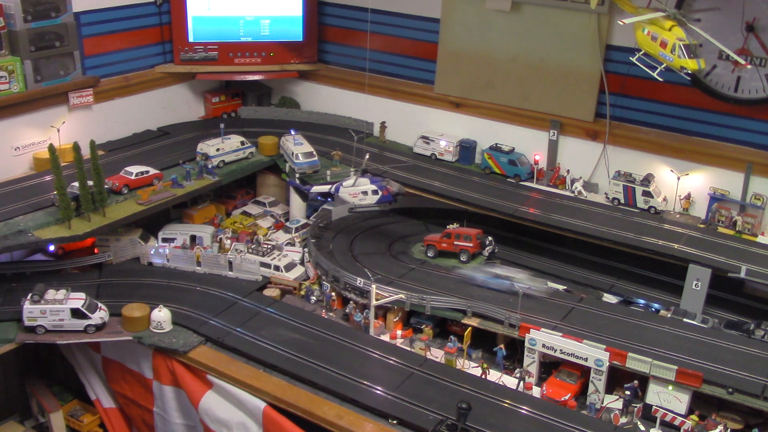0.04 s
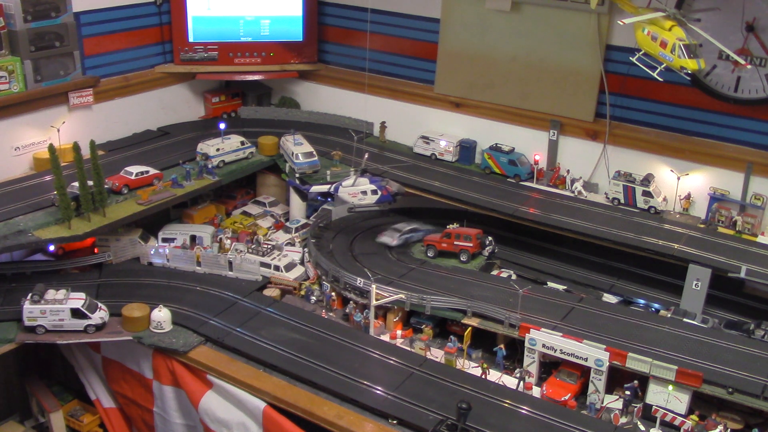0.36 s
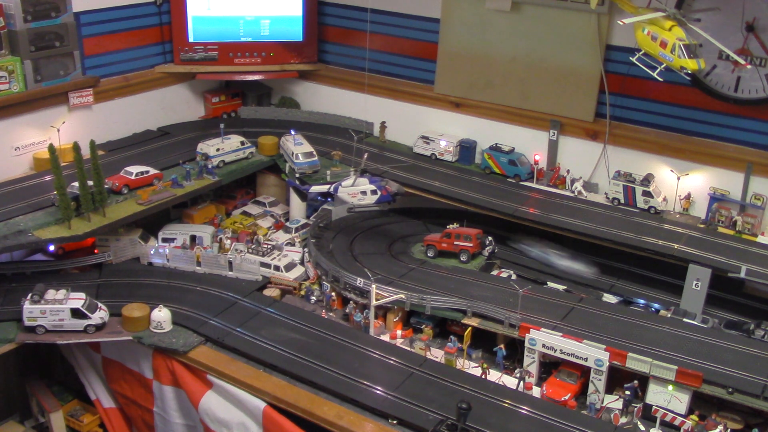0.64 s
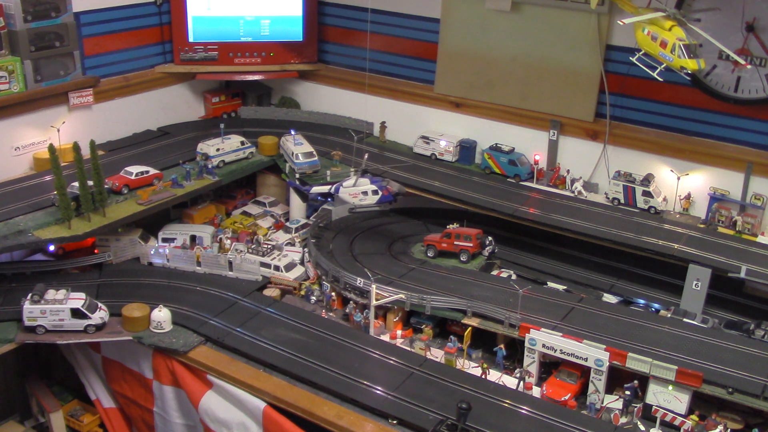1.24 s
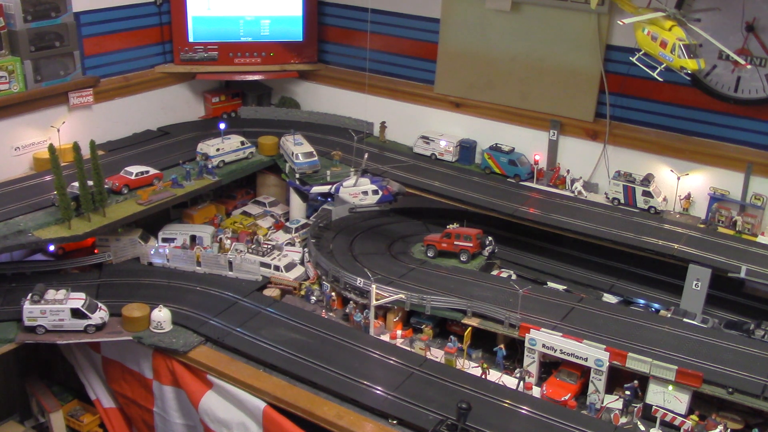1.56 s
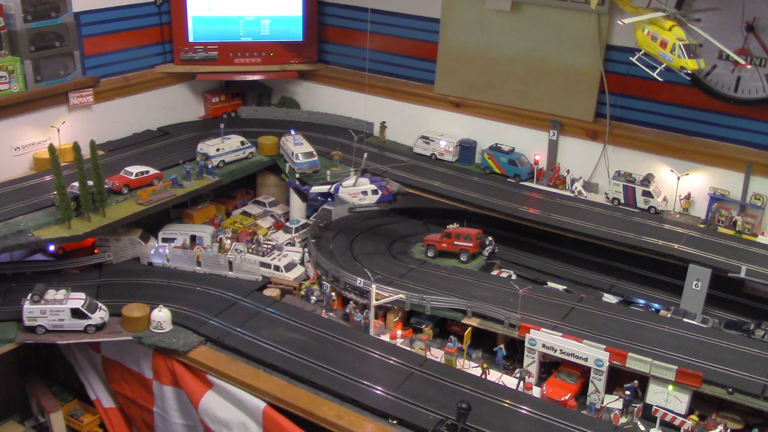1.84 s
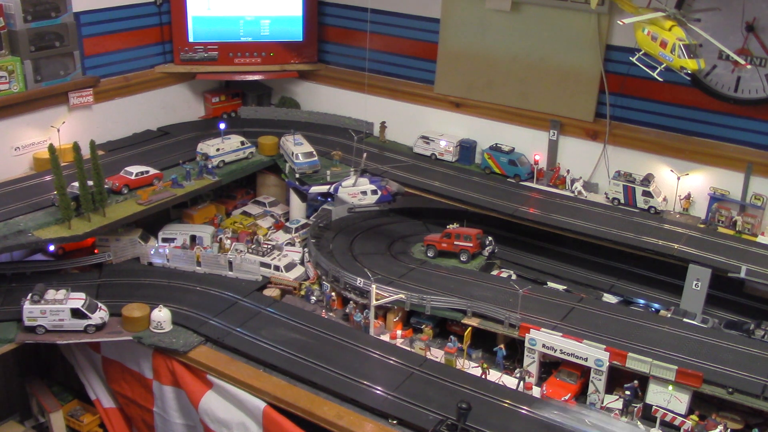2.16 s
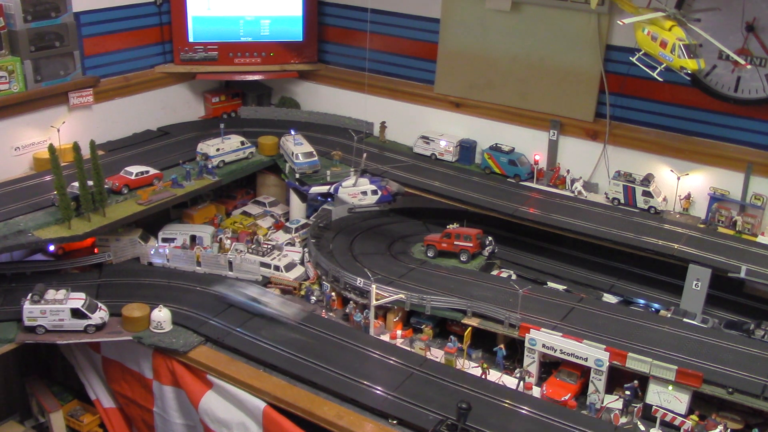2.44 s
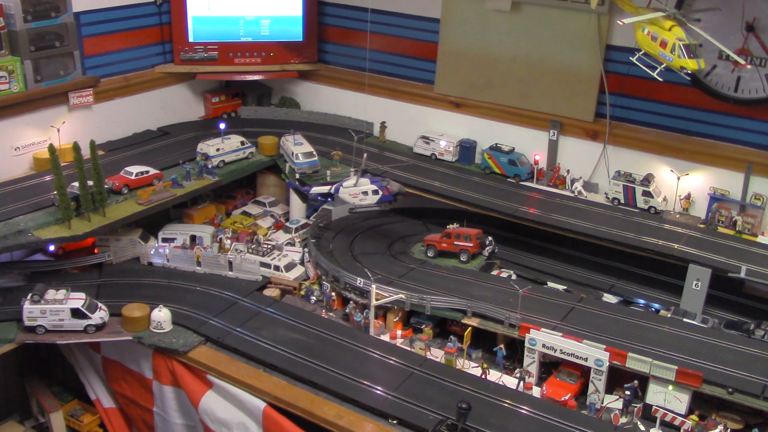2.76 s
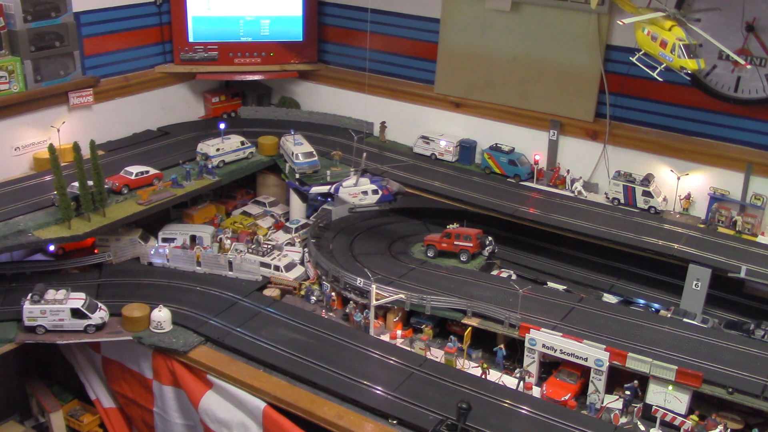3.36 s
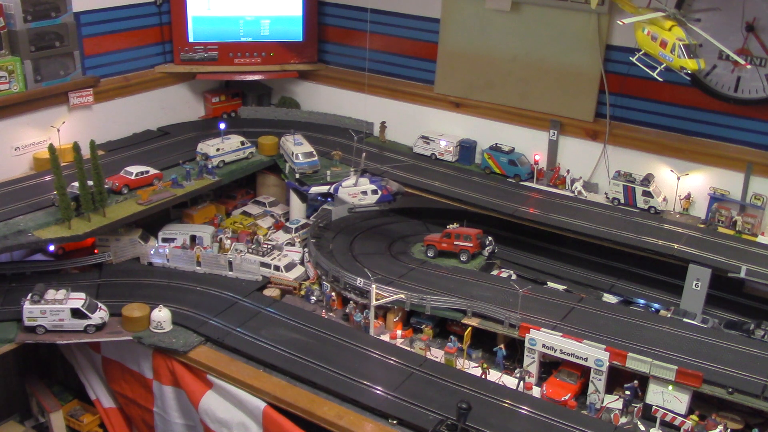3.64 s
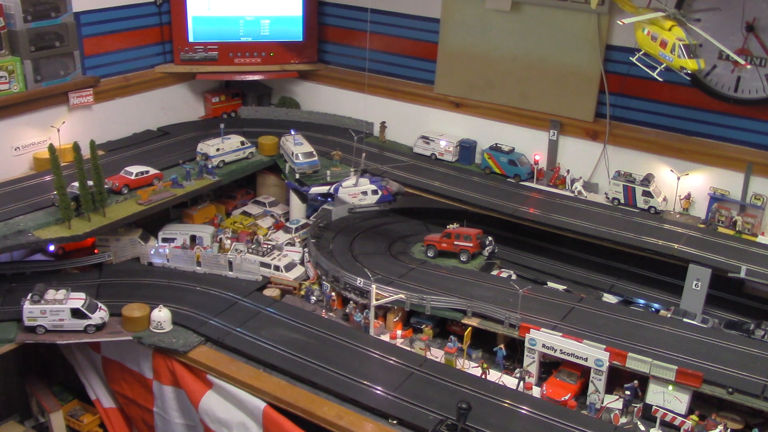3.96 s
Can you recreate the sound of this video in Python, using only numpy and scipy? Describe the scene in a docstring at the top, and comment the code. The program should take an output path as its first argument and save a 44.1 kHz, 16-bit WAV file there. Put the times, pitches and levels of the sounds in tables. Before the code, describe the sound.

A toy slot car runs continuously around an indoor track with a light rattle, wavering whir and scattered clicks. It sizzles on the metal rails as it passes near the microphone, then carries on farther away with small plastic knocks.

```python
"""A toy slot car runs on a plastic track in a small room, passes near, then goes on along the far side.
Its tyres drum on the hollow track, its loose chassis rattles, its pickup braids scrape on the rails
and its guide clacks over the joints: each is a train of tiny impacts filtered by a resonant body.
The gears whine, the braids squeak, and the plastic shell knocks and buzzes.
Reflections from the board and the room keep changing, over a faint steady background noise."""
import sys
import numpy as np
from scipy import signal
from scipy.fft import rfft, irfft
from scipy.io import wavfile
from scipy.ndimage import uniform_filter1d

SR = 44100
rng = np.random.default_rng(int(sys.argv[2]) if len(sys.argv) > 2 else 0)


def generate_wav(signal):
    """Clip the signal to [-1, 1] and save it as 16-bit WAV at the path in sys.argv[1]."""
    frames = np.transpose(np.atleast_2d(signal))
    scaled = np.clip(frames, -1, 1) * 32767
    pcm = np.round(scaled).astype(np.int16)
    wavfile.write(sys.argv[1], SR, pcm)


N = 176400

# Spectrum of the metal rails. Each row: frequency in Hz, relative level in dB.
RAIL_SPECTRUM = [(30, -56), (1500, -13.5), (3400, 5.5), (4300, 1.5), (5200, -2), (7500, -2), (10000, -3.5),
                 (12500, -11), (16000, -27)]


def undb(db):
    """Decibels to amplitude ratio."""
    return 10 ** (np.asarray(db) / 20)


def unit(x):
    """Normalisation to rms 1."""
    return x / np.sqrt(np.mean(x ** 2))


def curve(rows, t):
    """Linear interpolation in time of each column after the first."""
    times, *columns = np.array(rows).T
    return [np.interp(t, times, column) for column in columns]


def walk(per_s):
    """Low-pass noise of rms 1: random values joined by straight lines."""
    knots = rng.standard_normal(N)
    return unit(np.interp(np.arange(N) / SR * per_s, np.arange(N), knots))


def ticks(per_s, spread_db):
    """A Poisson train of impacts of random size and sign, with rms near 1."""
    hit = rng.random(N) < per_s / SR
    size = undb(spread_db * np.minimum(rng.exponential(size=N), 4))
    impacts = hit * size * rng.choice([-1., 1.], N)
    return impacts / np.sqrt(uniform_filter1d(impacts ** 2, size=8001) + 1e-12)


def body(force, spectrum, modes=(), size=4096):
    """Forced vibration: a minimum-phase response with added resonances, scaled to unit energy."""
    f = np.maximum(np.arange(size // 2 + 1) * SR / size, 1)
    hz, db = np.array(spectrum).T
    cepstrum = irfft(np.log(undb(np.interp(np.log(f), np.log(hz), db))))
    cepstrum[1:size // 2] *= 2  # folding the cepstrum makes the response causal
    cepstrum[size // 2 + 1:] = 0
    ringing = 1 + sum(undb(gain_db) / (1 + 1j * centre / width * (f / centre - centre / f))
                      for centre, width, gain_db in modes)
    response = irfft(np.exp(rfft(cepstrum)) * ringing)
    return signal.fftconvolve(force, response / np.linalg.norm(response))[:N]


def burst(t, start, rise_s, decay_s):
    """Envelope of a damped vibration: linear rise, exponential decay."""
    age = t - start
    return np.clip(age / rise_s, 0, 1) * np.exp(-np.maximum(age - rise_s, 0) / decay_s)


def fade(x, decay_s):
    """Leaky integration gives every impulse an exponential tail."""
    return signal.lfilter([1], [1, -np.exp(-1 / (decay_s * SR))], x)


def glide(t, start, length, from_hz, to_hz):
    """A half-sine swell and the linear frequency sweep that goes with it."""
    progress = np.clip((t - start) / length, 0, 1)
    return np.sin(np.pi * progress), from_hz + (to_hz - from_hz) * progress


def car(t):
    """Impact excitation: rolling, sliding and clacks drive the track, the chassis and the rails."""
    # Each row: time in seconds, then relative levels of drumming, rattle and scrape in dB.
    running_levels = [(0.0, -36, -25.5, -38.5), (0.27, -35.5, -30.5, -33.5), (0.39, -40, -28, -29.5),
                      (0.51, -31, -27.5, -31.5), (0.62, -38.5, -28, -25.5), (0.81, -33.5, -27.5, -31.5),
                      (0.95, -35, -26, -31), (1.16, -36, -30.5, -39), (1.29, -34, -28.5, -36.5),
                      (1.51, -38.5, -28, -33.5), (1.65, -28.5, -28.5, -38), (1.76, -36.5, -29, -31),
                      (1.99, -34.5, -26, -31.5), (2.21, -34.5, -22, -30), (2.47, -35.5, -27, -33.5),
                      (2.65, -39, -25.5, -35.5), (2.86, -37, -28, -34.5), (3.04, -35, -25, -32.5),
                      (3.29, -40, -26.5, -34), (3.44, -33.5, -23, -32), (3.64, -39, -27.5, -36.5),
                      (3.87, -37, -23.5, -35.5), (4.0, -59, -23.5, -44)]
    # The throttle eases. Each row: centre and half length in seconds, rattle and scrape change in dB.
    lulls = [(0.08, 0.059, -5.5, -1.5), (0.353, 0.026, -5, -13), (.955, 0.0094, -3, 1),
             (1.06, 0.046, -0.5, -2.5), (1.395, 0.061, -8, -6.5), (1.472, 0.024, -11, -0.5),
             (1.707, 0.015, -2.5, -7.5), (1.787, 0.012, -5, -18), (2.453, 0.0086, -1, -18),
             (2.714, 0.057, -4.5, -3), (3.141, 0.07, -6.5, -5.5), (3.45, 0.012, -6, 0),
             (3.607, 0.011, -8, -6)]
    # How loosely the car rides. Each row: time in seconds, spread of impact sizes in dB.
    looseness = [(0, 1), (.8, 4), (1.5, 1), (2.2, -0.5), (3.0, -2), (3.4, 2.5), (4, -0.5)]
    drum_db, rattle_db, scrape_db = curve(running_levels, t)
    for centre, half_length, rattle_change_db, scrape_change_db in lulls:
        eased = np.exp(-((t - centre) / half_length) ** 2)
        rattle_db += rattle_change_db * eased
        scrape_db += scrape_change_db * eased
    spread_db, = curve(looseness, t)
    wheel_hz = 32.9 * (1 + 0.1505 * walk(per_s=4))
    wheel_turns = np.cumsum(wheel_hz) / SR
    judder_db = 1.08 * walk(per_s=45.36)
    contact = (1 + 0.097 * np.sin(2 * np.pi * wheel_turns)) * undb(0.5 + judder_db)
    thump, clatter, edge = clacks(t)
    drum = contact * undb(drum_db) * ticks(per_s=1500, spread_db=3.5) + thump
    rattle = contact * undb(rattle_db) * ticks(per_s=2200, spread_db=spread_db) + clatter
    scrape_db += 1.63 * walk(per_s=21.82)  # the braids flutter
    scrape = contact * undb(scrape_db) * ticks(per_s=4500, spread_db=spread_db) + edge
    return track(drum) + chassis(t, rattle) + braids(t, scrape, scrape_db)


def track(force):
    """Resonance: the hollow track answers the tyres with a few low modes."""
    # Spectrum of the track. Each row: frequency in Hz, relative level in dB.
    spectrum = [(30, -48), (80, -62), (125, -39), (175, -19), (215, -13), (280, -3.5), (400, 0), (520, 0),
                (700, 4.5), (1000, 1), (1400, 2), (3000, -20), (16000, -65)]
    # Its resonances. Each row: frequency in Hz, bandwidth in Hz, gain in dB.
    modes = [(277, 31, -8.5), (475, 9.5, -4), (810, 30, -4.5), (856, 56, 3.5)]
    return body(force, spectrum, modes)


def chassis(t, force):
    """Forced vibration of the loose chassis, whose timbre changes on the far stretch."""
    # Spectra before and on the far stretch. Each row: frequency in Hz, relative level in dB.
    near_spectrum = [(30, -84), (500, -18.5), (950, -4.5), (1230, -3), (1500, 3), (1800, 1.5), (2200, 3),
                     (2750, -1.5), (3500, -3.5), (4200, -10.5), (6000, -9.5), (16000, -28.5)]
    far_spectrum = [(30, -85), (110, -40), (180, -21), (280, -17), (600, -25), (1100, -1.5), (1700, 1.5),
                    (2400, 2), (3400, -7.5), (4200, -18), (5300, -8), (7000, -14.5), (9000, -25.5),
                    (16000, -31)]
    far = np.interp(t, [2.97, 3.03], [0, 1])
    return body(force * (1 - far), near_spectrum) + body(force * far, far_spectrum)


def braids(t, scrape, scrape_db):
    """Sliding friction: the braids scrape the rails, with sizzle and crackle while the car is near."""
    pass_s, half_length_s = 2.2, 0.58
    near_gain = np.exp(-((t - pass_s) / half_length_s) ** 4) * undb(scrape_db)
    # Spectrum of the sizzle. Each row: frequency in Hz, relative level in dB.
    sizzle_spectrum = [(30, -80), (3000, -34), (5500, -0.5), (7500, 4.5), (9500, -3), (12500, -3.5),
                       (16000, -21)]
    sizzle = near_gain * undb(-1.5) * ticks(per_s=900, spread_db=4)
    pops = fade(np.abs(ticks(per_s=130, spread_db=2.5)), decay_s=0.0011)
    crackle = near_gain * undb(-8.5) * unit(pops * rng.standard_normal(N))
    return body(scrape + crackle, RAIL_SPECTRUM) + body(sizzle, sizzle_spectrum)


def air():
    """Ambient noise: the faint, steady, mostly low sound of the room."""
    # Each row: frequency in Hz, relative level in dB.
    spectrum = [(30, -5), (90, -0.5), (200, 8), (1000, -16), (16000, -40)]
    return undb(-69.5) * body(rng.standard_normal(N), spectrum)


def gears(t):
    """Gear-mesh tones glide as the car changes speed; random modulation makes them waver and grind."""
    # Each row: start and length in seconds, first and last pitch in Hz, level in dB.
    whines = [(0.158, 0.13, 900, 856, -34), (0.53, 0.2, 2470, 2240, -26.5), (0.559, 0.088, 2160, 1967, -23),
              (0.544, 0.09, 3450, 3390, -30), (0.688, 0.17, 1400, 1444, -28),
              (0.697, 0.26, 1540, 1470, -28.5), (0.697, 0.27, 3560, 3380, -32),
              (.77, 0.37, 2250, 1990, -38), (0.791, 0.2, 840, 787, -32.5), (0.893, .32, 1450, 1503, -34.5),
              (1.199, .32, 1500, 1392, -36), (1.386, 0.38, 1960, 1874, -32), (1.686, 0.12, 830, 803, -27),
              (2.074, .34, 860, 885, -29.5), (2.457, 0.22, 890, 845, -29), (2.969, 0.17, 1596, 1536, -31),
              (2.952, 0.13, 1350, 1425, -30.5), (3.01, 0.25, 910, 869, -39), (3.23, 0.088, 2540, 2540, -30),
              (3.265, .18, 3450, 3410, -36), (3.801, .2, 1886, 1733, -22)]
    waver = 1 + 0.008 * walk(per_s=150)
    grind = unit(1 + 0.77 * walk(per_s=120.1))
    tones = np.zeros(N)
    for *stretch, db in whines:
        swell, hz = glide(t, *stretch)
        tones += undb(db) * swell * np.sin(2 * np.pi * np.cumsum(hz * waver) / SR)
    return tones * grind


def clacks(t):
    """Rebounding impacts of the guide on joints and slot give forces on track, chassis and rails."""
    # Each row: start in seconds, relative level in dB, decay in seconds,
    # then the track's thump and the rails' bright edge in dB relative to the chassis.
    strikes = [(0.201, -20, 0.025, -6, -2), (0.29, -21, 0.022, -3.5, -5.5), (0.409, -37, 0.037, 9, -9),
               (0.483, -17, 0.0066, -12, -1.5), (0.575, -22.5, 0.029, -1.5, 5.5),
               (0.607, -31.5, 0.028, 5.5, -12), (0.963, -20, 0.013, -22, -3), (1.149, -21.5, 0.035, -8, -7),
               (1.452, -18, 0.0099, -23, -7), (1.651, -15, 0.023, -6.5, -21), (1.728, -26, 0.017, -9, -2),
               (1.773, -20, 0.017, -18, -15), (2.2, -34, 0.009, 7, -7), (2.292, -18, 0.019, -6, -16),
               (2.323, -15, 0.012, -9, -9), (2.427, -29, 0.0061, -14, 6.5), (2.479, -27, 0.039, -1, -18),
               (2.626, -23.5, 0.012, 0, -7), (2.914, -14, 0.022, -4, -3.5), (3.344, -19.5, 0.0069, -9, 1),
               (3.405, -20, 0.0059, -18, -14), (3.506, -20, 0.045, -31, -4), (3.565, -24, 0.033, -6.5, -4),
               (3.855, -20, 0.049, -21, -7), (3.976, -14, 0.013, -25, -15), (3.987, -13, 0.0058, -16, -15)]
    envelopes = np.zeros((3, N))
    for start, db, decay_s, thump_db, edge_db in strikes:
        gains = undb(db - 1 + np.array([[thump_db], [0], [edge_db]]))
        envelopes += gains * burst(t, start, rise_s=0.0024, decay_s=decay_s)
    return [envelope * ticks(per_s=4000, spread_db=1.0) for envelope in envelopes]


def squeaks(t):
    """Stick-slip friction: the braids catch and give a high band of noise inside a broader scrape."""
    # Each row: start in seconds, centre frequency in Hz, relative level in dB, decay in seconds.
    catches = [(.676, 8970, -19, 0.01), (.692, 8850, -23, .007), (.703, 9800, -24, .009),
               (1.096, 12300, -42, 0.022), (1.925, 10400, -35, 0.051), (2.012, 12000, -30, 0.014),
               (2.055, 10450, -34, 0.011), (2.62, 8850, -26, 0.026), (2.626, 10500, -29, 0.041)]
    narrow = walk(per_s=2600) + 1j * walk(per_s=2600)
    broad = walk(per_s=8000) + 1j * walk(per_s=8000)
    rough = narrow + undb(-2) * broad
    sound = np.zeros(N)
    for start, hz, db, decay_s in catches:
        band = np.real(rough * np.exp(2j * np.pi * hz * t))
        sound += undb(db) * burst(t, start, rise_s=0.0026, decay_s=decay_s) * band
    return sound


def knocks(t):
    """Damped free vibration: each knock rings the shell's modes and ticks against the rails."""
    # Each row: start in seconds, pitch in Hz, level in dB, decay in seconds, tick offset in dB.
    blows = [(0.965, 1624, -11, 0.0065, -12), (0.972, 3220, -21, 0.0076, -3),
             (1.451, 1950, -22, 0.0054, -3), (2.14, 1550, -12, 0.0044, -6), (2.168, 1880, -25, 0.0026, -5),
             (2.915, 2064, -11.5, 0.0099, -8), (2.919, 2924, -9.5, 0.0057, 0),
             (3.252, 2200, -12.5, 0.0041, -8.5), (3.327, 1980, -12.5, 0.0049, -20),
             (3.351, 2410, -23, .003, -7), (3.369, 2290, -12, 0.0033, -16),
             (3.408, 2520, -12, 0.0026, -6.5), (3.476, 2520, -13, 0.0027, -10),
             (3.51, 2360, -9.5, 0.0035, -7), (3.565, 2260, -12, .0025, -6.5),
             (3.624, 2120, -13.5, 0.0033, -6), (3.662, 1740, -11.5, 0.0024, -10),
             (3.691, 1530, -19, .002, -5), (3.9884, 1760, -7, 0.0032, -16)]
    # Modes of the shell. Each row: multiple of the knock's pitch, gain in dB.
    shell_modes = [(.87, -11.5), (1, -1.5), (1.28, -11.5)]
    rise_s, tick_decay_s = 0.00045, 0.0023
    ring, tick = np.zeros(N), np.zeros(N)
    for start, hz, db, decay_s, tick_db in blows:
        now = (t >= start) & (t < start + 10 * decay_s)
        phase = 2 * np.pi * hz * (t[now] - start)
        modes = sum(undb(gain_db) * np.sin(ratio * phase) for ratio, gain_db in shell_modes)
        ring[now] += undb(db) * burst(t[now], start, rise_s, decay_s) * modes
        tick[now] += undb(db + tick_db) * burst(t[now], start, rise_s, tick_decay_s)
    return ring + body(tick * rng.standard_normal(N), RAIL_SPECTRUM)


def buzzes(t):
    """Random excitation: quick taps sustain one resonance of the shell, which sinks in each buzz."""
    # Each row: start and length in seconds, first and last pitch in Hz, level in dB.
    stretches = [(2.467, 0.14, 2290, 2078, -28), (3.24, .17, 2295, 2014, -27),
                 (3.628, 0.12, 1800, 1646, -32), (3.797, 0.27, 1656, 1412, -25.5)]
    taps = ticks(per_s=770, spread_db=2) * np.exp(2j * np.pi * rng.random(N))
    ringing = fade(fade(taps, decay_s=0.0003), decay_s=0.0003)
    ringing /= np.std(ringing.real)
    sound = np.zeros(N)
    for *stretch, db in stretches:
        swell, hz = glide(t, *stretch)
        sound += undb(db) * swell * np.real(ringing * np.exp(2j * np.pi * np.cumsum(hz) / SR))
    return sound


def shell(t):
    """The knocks and buzzes of the shell are high-passed, so they carry little bass."""
    cutoff_hz = 710
    high_pass = signal.butter(2, cutoff_hz, "high", fs=SR, output="sos")
    return signal.sosfilt(high_pass, knocks(t) + buzzes(t))


def echoes():
    """Impulse response from one spot on the track: direct sound and two decaying sets of reflections."""
    t = np.arange(SR // 3) / SR
    response = np.zeros(len(t))
    for t60_s, db, gap_s in ((0.031, -5, 0.0008), (0.18, -6, 0.006)):  # board, then room
        tail = rng.standard_normal(len(t)) * np.exp(-np.log(1000) * t / t60_s) * (t > gap_s)
        response += undb(db) * tail / np.linalg.norm(tail)
    response[0] = 1
    return response / np.linalg.norm(response)


def room(x):
    """Time-varying reverberation: as the car moves, each overlapping frame meets new reflections."""
    hop = int(0.025 * SR)
    padded, sound = np.pad(x, (hop, 2 * hop)), np.zeros(N + SR)
    for start in range(0, N + hop, hop):
        frame = padded[start:start + 2 * hop] * np.hanning(2 * hop)
        heard = signal.fftconvolve(frame, echoes())
        sound[start:start + len(heard)] += heard
    return sound[hop:hop + N]


def scene():
    """Superposition of the reverberant contact sounds, the direct gear tones and the ambient noise."""
    t = np.arange(N) / SR
    contact_sounds = car(t) + squeaks(t) + shell(t)
    return (room(contact_sounds) + gears(t) + air())[None]


def record(dry):
    """Band limiting: a gentle high-pass thins the bass and a steep low-pass cuts the top."""
    low_hz, top_hz = 60, 15750
    thin = signal.sosfilt(signal.butter(1, low_hz, "high", fs=SR, output="sos"), dry)
    return signal.sosfilt(signal.ellip(10, .2, 80, top_hz, fs=SR, output="sos"), thin)


dry = scene()
out = record(dry)
generate_wav(out)
```